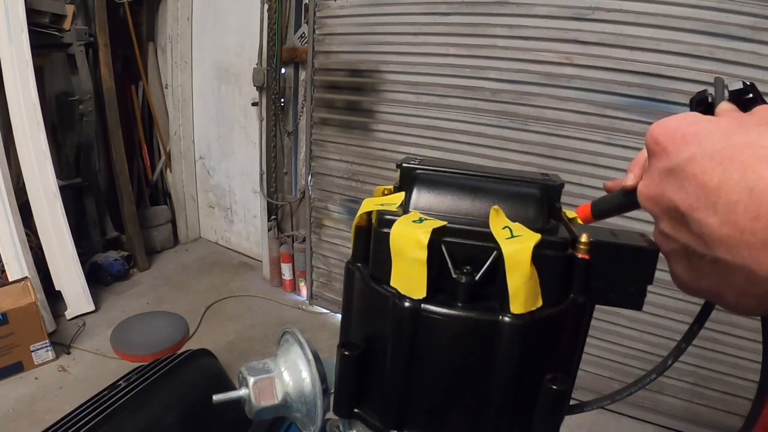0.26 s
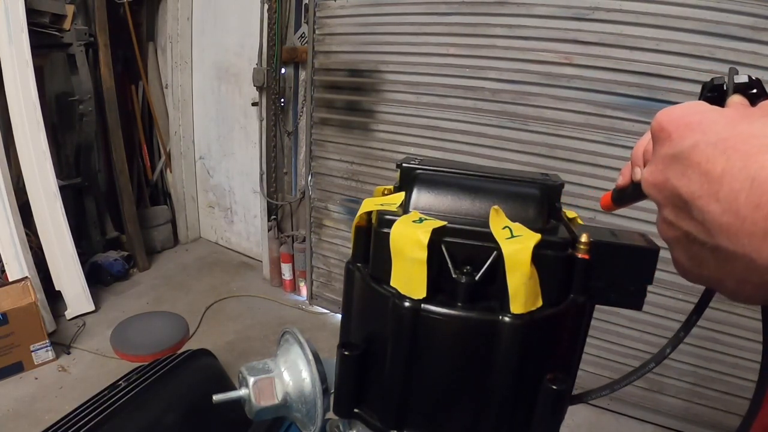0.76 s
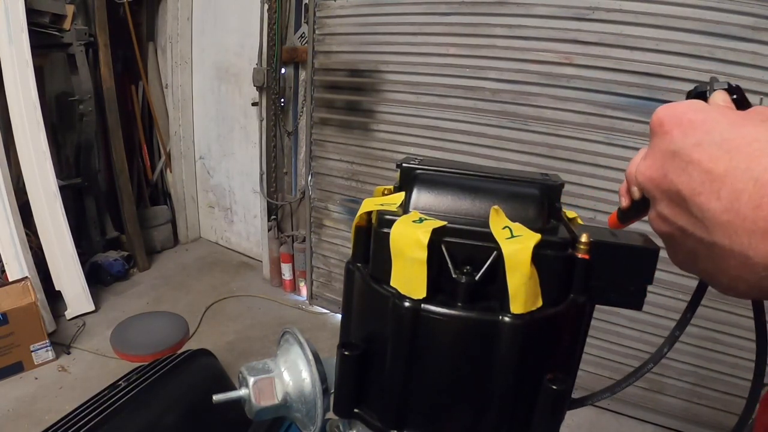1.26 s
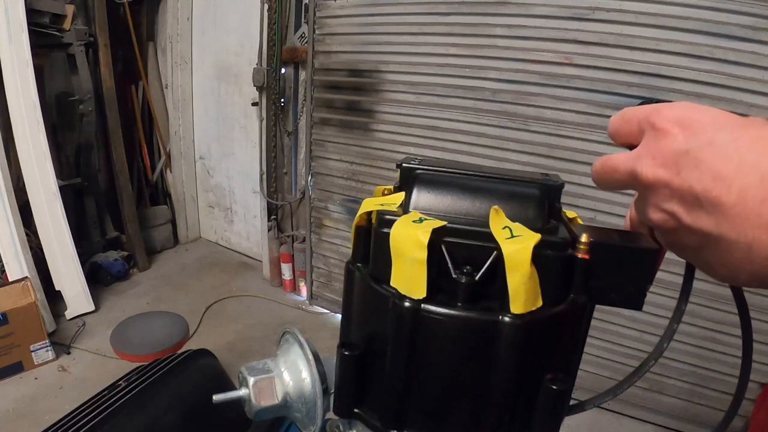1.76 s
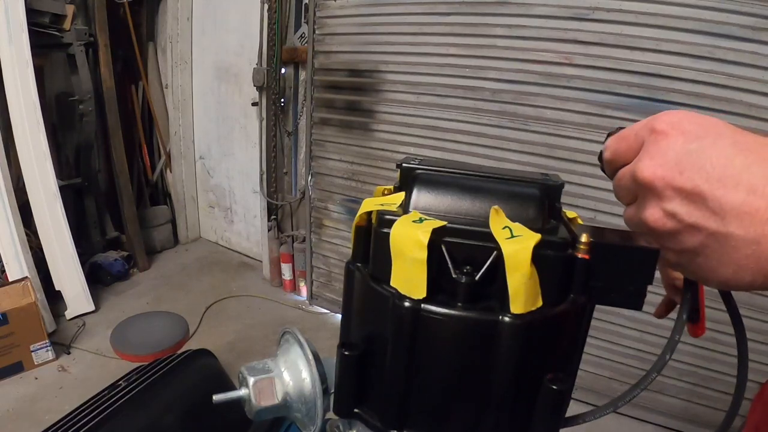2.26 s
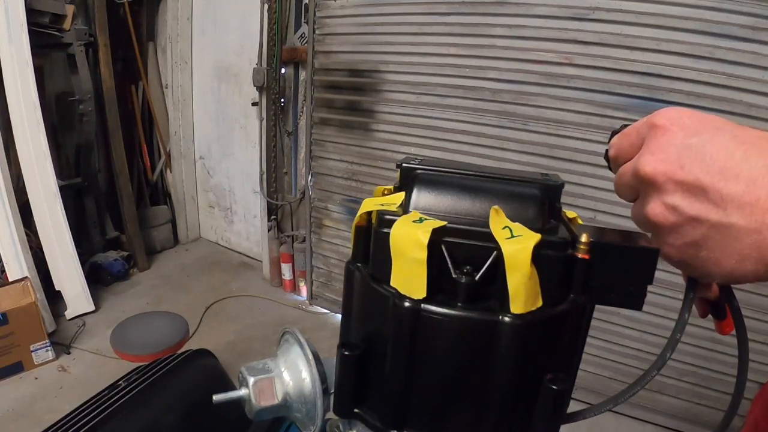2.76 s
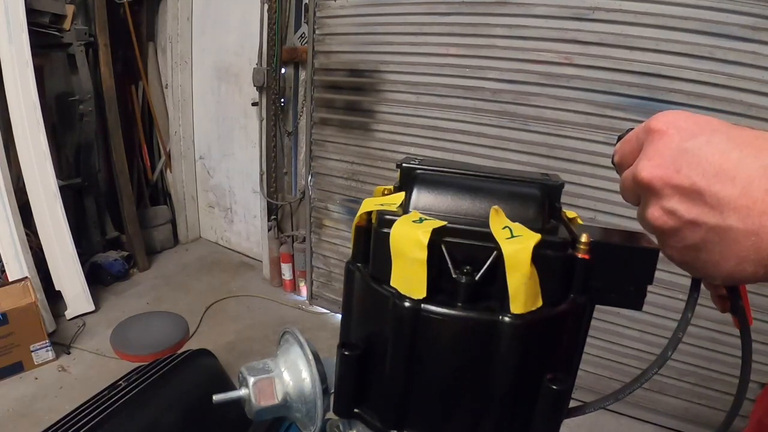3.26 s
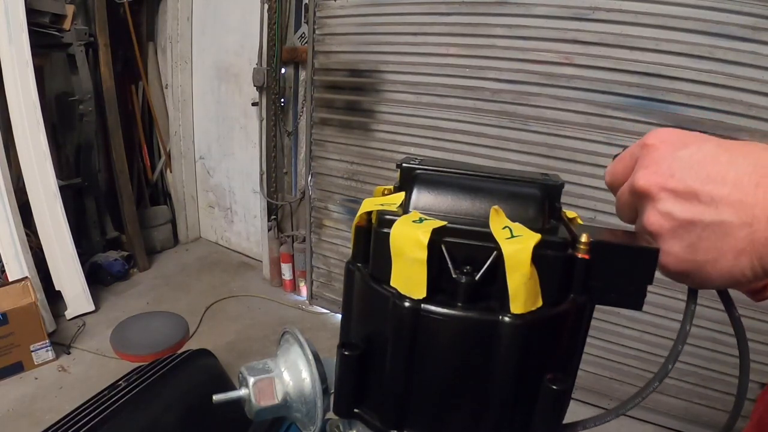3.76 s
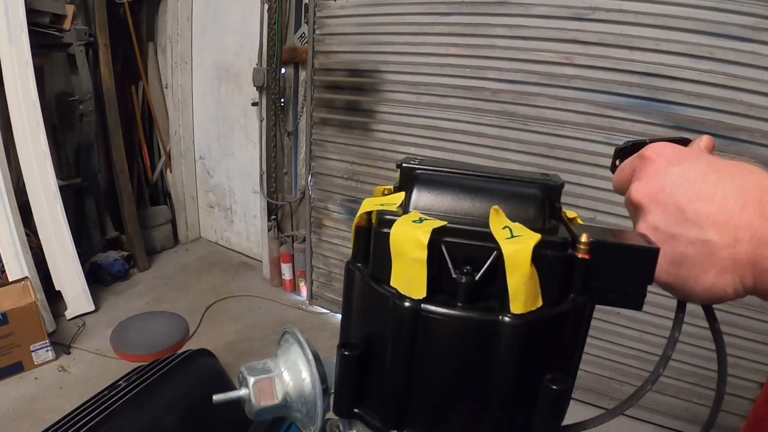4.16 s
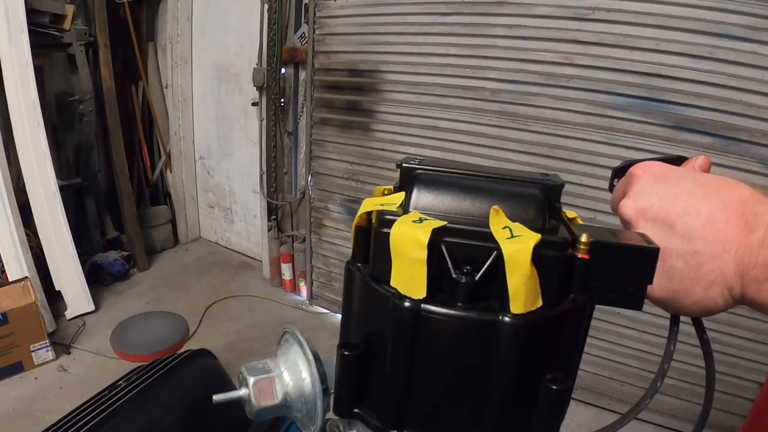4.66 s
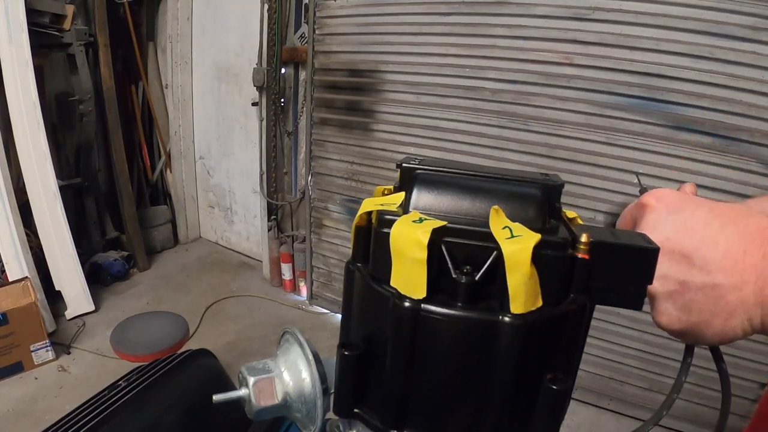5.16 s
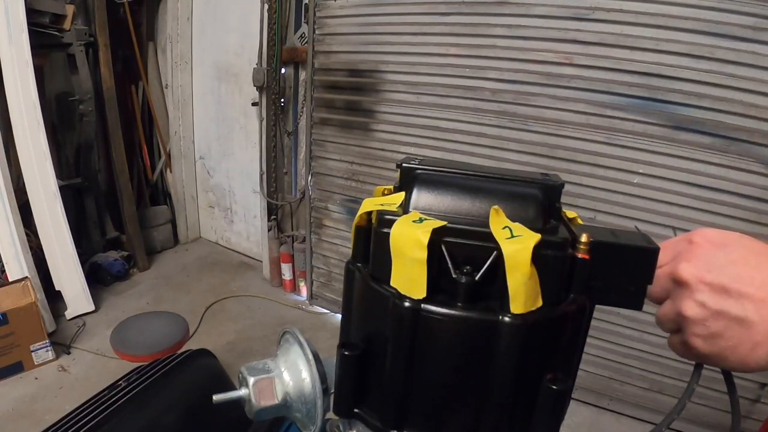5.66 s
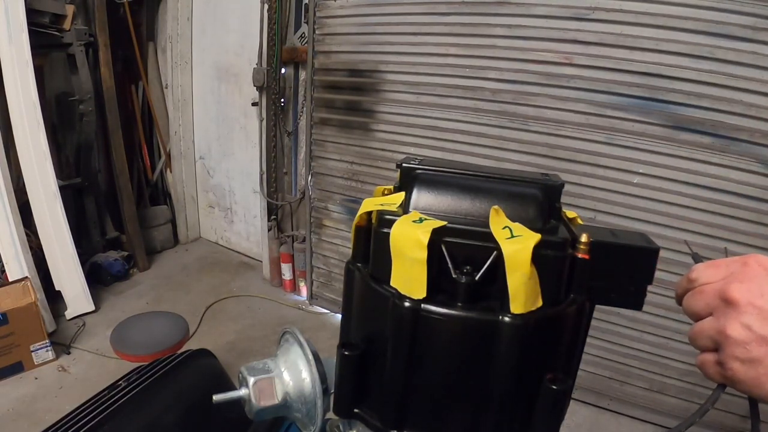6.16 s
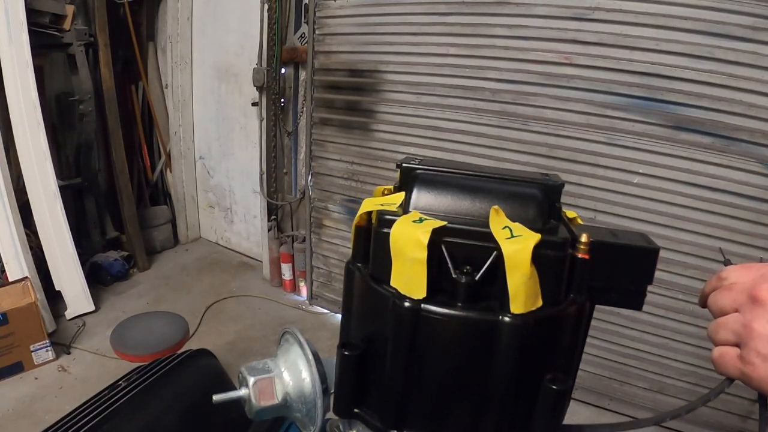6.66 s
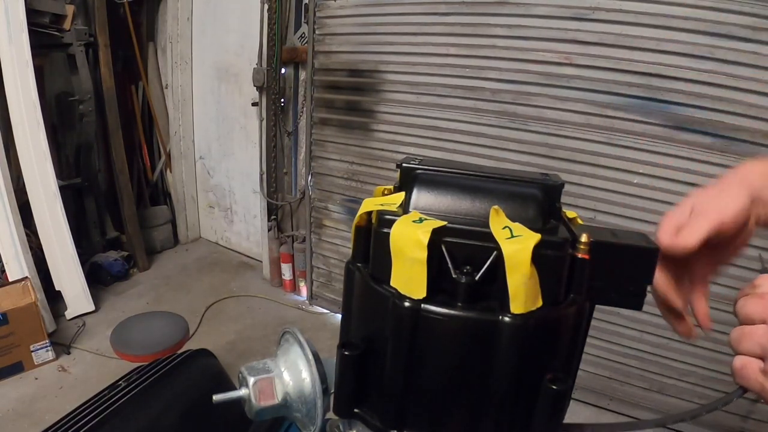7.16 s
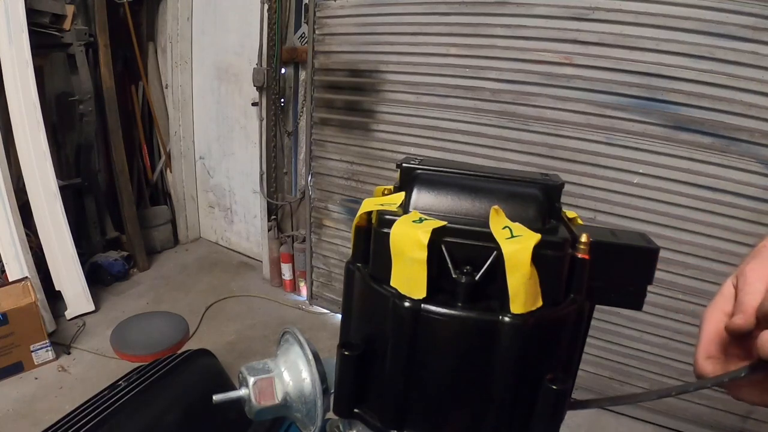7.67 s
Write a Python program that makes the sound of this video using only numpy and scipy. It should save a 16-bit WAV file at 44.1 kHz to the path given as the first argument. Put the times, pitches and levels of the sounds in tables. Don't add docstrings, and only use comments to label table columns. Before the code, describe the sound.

In a hard, echoing garage, ratcheting hand pliers close very near the microphone: three slow, crisp clicks, a pause, then six faster hard snaps. After a small snap and dull jolt the jaws spring open in a rapid rattle. The tool is dropped on a bench with ringing knocks, while hands rub a cable. Distant traffic, faint machine drones and an engine pulling away stay low behind.

```python
import sys
import numpy as np
from scipy import signal
from scipy.fft import irfft
from scipy.io import wavfile
from scipy.ndimage import uniform_filter1d

SR = 44100
rng = np.random.default_rng(int(sys.argv[2]) if len(sys.argv) > 2 else 0)


def amplitude_ratio(level_db):
    exponent = np.asarray(level_db, float) / 20
    return 10 ** exponent


def waveform_to_disk(signal):
    frames = np.transpose(np.atleast_2d(signal))
    scaled = np.clip(frames, -1, 1) * 32767
    samples = np.round(scaled).astype(np.int16)
    wavfile.write(sys.argv[1], SR, samples)


N = 349272

# (time [s], peak [dB], handle re peak [dB], low jaw re peak [dB], tick re peak [dB])
SLOW_TEETH = [
    (.8236, -1.8, 2.5, 0.31, 1.5),
    (1.0004, -0.46, -2, -0.89, 1.8),
    (1.2314, -1.5, -3, -2, 2.7),
]
FAST_TEETH = [
    (3.5657, -2.5, -0.5, -4.5, -0.5),
    (3.6039, 0, -4, -8.5, -2.5),
    (3.6314, -1.5, -5.5, -10.5, -3.5),
    (3.6593, 0.5, -8, -11, -3.5),
    (3.7878, 0, -1, 0, 1),
    (3.8622, 0, -0.5, -5, -0.5),
]
RELEASE = [
    (5.1016, -16, -0.5, -5, 7),
    (5.1717, -9.5, 7, 7.5, 4.5),
    (5.1898, -5, 4, 1, 1.5),
    (5.2016, -7.5, 8, 3, -1.5),
    (5.2141, -4.5, 2, 2, -2),
    (5.2244, -4.5, 5, -3, -2),
    (5.2343, -6.5, 9, 0, -2),
    (5.2459, -7, 6, -3.5, -1.5),
    (5.2953, -6.5, 2, -6.5, -6.5),
]
TICKS = [(.2445, -32, -15.5, -7.5, 1), (.25, -42.5, -26, -6, 0.5), (.4828, -36, -0.5, 5, -6),
         (.579, -43.5, -15.5, -1.5, -1.5), (.6453, -46.5, -10, 5, -2), (.658, -46, -4, 5, -0.5),
         (.803, -41.5, -12.5, -1.5, 1), (.8132, -29, -13, -2.5, 1.5), (.99, -38.5, -20, -13.5, 14),
         (1.221, -37.5, -21.5, -14, 13.5), (2.0625, -45, -10, -1, -4), (2.28, -52, -9.5, -7.5, 5),
         (3.546, -41.5, -13.5, -8, -4), (3.5549, -30, -11, -9.5, -6.5)]
SNAP = [
    (4.8261, -17, -34, 0.015, 0),
    (4.837, -26, 2, 0.005, 0),
]
# (frequency [Hz], level [dB], t60 [s])
JAWS_OPEN = [(2225, -3.5, 0.011), (2650, -2, 0.0076), (2930, 2, 0.005), (3560, -5, 0.0066),
             (3880, -5.5, 0.0032), (4570, -3, 0.0047), (5010, -8.5, 0.011), (5584, -15.5, 0.0098),
             (6180, -9, 0.007), (7680, -6.5, 0.0033), (8600, -11.5, 0.0065), (9510, -8.5, 0.0069),
             (10750, -18, 0.012), (12900, -25, 0.0024)]
JAWS_LOADED = [(2271, -4, 0.0044), (2700, -2.5, 0.0061), (2909, -6.5, 0.0087), (3500, -3, 0.0054),
               (3876, -2.5, 0.0081), (4300, -4, 0.0047), (4470, -6, 0.0087), (5130, -7.5, 0.004),
               (6320, -10, 0.0047), (7260, -8, .005), (8230, -8.5, 0.0047), (9250, -13, 0.003),
               (10500, -15.5, 0.0057), (12110, -23.5, .003)]
JAWS_FREE = [(1360, -13, 0.0078), (2000, -9.5, 0.0031), (2450, -1, 0.0075), (2650, -5, 0.0066),
             (2940, -2, 0.0087), (3930, -1.5, 0.0035), (4480, -5, 0.0054), (5260, -11.5, 0.0045),
             (5925, -6, 0.003), (6800, -4.5, 0.0031), (7450, -8, 0.0031), (8400, -9.5, 0.0028),
             (9660, -8.5, .004), (10780, -11, 0.0044), (13000, -16.5, 0.0036)]
JAWS_SNAP = [(2720, -10, 0.01), (4990, -2, 0.024), (6300, -1, 0.02), (8170, -10, 0.0066), (9750, 5.5, .012),
             (10950, -2.5, 0.013), (13160, -7, .005)]
# (frequency [Hz], level [dB], t60 [s])
GRIP_MODES = [(627.7, -6.5, 0.016), (860, -2.5, 0.012), (1130, 0.5, .018)]
GRIP_DB = [-36, -26.5, -28, -30, -40]
# (time [s], frequency [Hz], level [dB], t60 [s])
PAWL = [(.824, 2050, -13, .01), (0.999, 2933, -11, .018), (1.001, 4704, -10, 0.011),
        (1.233, 2910, -12, 0.011), (3.606, 3750, -11.5, .01), (3.631, 3500, -8, .007),
        (3.6592, 3670, -9.5, .007), (3.863, 3850, -9.5, 0.009), (5.172, 2430, -9.5, 0.0096),
        (5.19, 2510, -13, .015), (5.201, 2550, -12.5, 0.013), (5.215, 2465, -19, .015),
        (5.225, 3050, -23, 0.012), (5.235, 3100, -26.5, 0.011), (5.246, 3000, -18, 0.019),
        (5.295, 3130, -13, 0.011)]
# (time [s], frequency [Hz], level [dB], t60 [s])
RINGS = [(.579, 2800, -54, .2), (.579, 3003, -58, .2), (.579, 3620, -53, 0.11), (.581, 5800, -60, 0.08),
         (.58, 8600, -71, .06), (.657, 8620, -63, .06), (.646, 3714, -52, .05), (.655, 2800, -56, 0.3),
         (6.292, 1722, -44, 0.95), (6.292, 1980, -37, 1), (6.292, 2540, -36, 0.77),
         (6.292, 3910, -47, 0.85), (6.292, 4460, -49, 0.78), (.826, 4330, -37.5, 0.44),
         (.826, 2455, -41, 0.46), (1.003, 2800, -45, 0.67), (1.003, 4387, -48, .5),
         (1.234, 2800, -49, 0.32), (1.234, 4334, -54, 0.36), (5.25, 1742, -47, 0.2), (5.298, 4300, -38, .3),
         (6.291, 335, -20.5, 0.25), (6.292, 2000, -35, 0.53), (6.29, 2610, -33, 0.38),
         (6.291, 1440, -44, 1), (6.292, 3360, -45, 1), (6.487, 346, -21.5, 0.44),
         (6.564, 2700, -25.5, 0.11), (6.564, 2970, -28, 0.084), (6.564, 372, -14.5, 0.16),
         (6.59, 1450, -30, 0.32), (6.599, 430, -23.5, 0.35), (6.718, 335, -23, 0.2), (5.9, 90, -38, 0.38),
         (7.76, 355, -40.5, 0.19), (6.291, 1080, -36, .12), (3.864, 1010, -28, .03), (4.83, 9600, -49, .25)]
# (time [s], length [s], level [dB])
SPRING = [
    (3.606, 0.064, -45.5),
    (3.67, 0.11, -41.5),
    (3.797, 0.066, -42.5),
]
# (time [s], peak [dB], boom re thud [dB], edge re thud [dB], tick re edge [dB])
KNOCKS = [(4.825, -20, 12, 6, 7), (6.267, -33.5, -7, 0, -15), (6.2778, -20, 2, -2, -9),
          (6.2884, 0.5, 0.5, 0, -7), (6.478, -42, -5, 9, 10), (6.483, -9, -12, -9, -10),
          (6.554, -20.5, -7, -6, 0), (6.516, -18.5, -8, -26, -6), (6.527, -13.5, 7, -21, -7),
          (6.56, -2, 1, -6.5, -2), (6.575, -7.5, 2, -6, -7), (6.597, -14.5, -16, 9, 1.5),
          (6.61, -39, -7, 4, 10), (6.617, -19, 11, -18, -5), (6.678, -17.5, -11, 3, 1),
          (6.7126, -26, -3, 8, 9), (6.717, -21, 5, -11, 0), (6.72, -32, -1, 8, 13.5)]
# (frequency [Hz], level [dB], t60 [s])
BENCH = [(209, -12, 0.052), (335, -3, 0.027), (430, -10, 0.073), (510, 4, 0.014), (729, 2, 0.021),
         (812, -2.5, 0.037), (987, -1.5, 0.012)]
EDGE = [(1235, -2, 0.032), (1450, 0, 0.025), (1773, -2, 0.031), (2000, -3, 0.019), (2190, 0, 0.013),
        (2554, 2.5, 0.016), (2800, -2.5, 0.015), (2980, 0.5, 0.0082), (3500, -9.5, .012),
        (3933, -8.5, 0.021), (4950, -12, 0.012), (5470, -22, 0.01), (6370, -19.5, 0.007)]
# (frequency [Hz], level [dB], t60 [s])
THUMP = [(119, -4, 0.07), (148, -4, 0.093), (224, -4, 0.059)]
# (peak time [s], rise [s], fall [s], level [dB])
SLIDE = [
    (6.53, 0.02, 0.046, -14),
    (6.58, 0.03, 0.043, -10),
    (6.702, 0.049, 0.055, -16),
]
# (peak time [s], rise [s], fall [s], level [dB], tilt [dB/octave])
RUB = [
    (4.827, 0.016, 0.047, -36.5, 2),
    (4.88, 0.035, .22, -65, -6),
    (5.098, 0.023, 0.012, -49, 8),
    (5.945, 0.096, 0.23, -54.5, 0.8),
    (6.08, 0.12, 0.22, -58.5, 0.5),
    (6.8, .15, 0.8, -61, -3),
    (7.25, .5, 0.32, -62, -0.5),
    (7.71, 0.032, 0.46, -54.5, -7.5),
    (6.56, 0.11, 0.21, -53, -2),
]
# (frequency [Hz], density [dB/Hz])
RUB_TONE = [(1180, -72), (2000, -1), (3210, -4.5), (4590, -3), (5310, -7.5), (6300, -8.5), (10600, -18),
            (14000, -34)]
# (frequency [Hz], t60 [s])
GARAGE = [(300, 0.45), (1000, 0.67), (2500, 0.71), (5000, 0.62), (8000, 0.46), (13000, 0.26)]
# (frequency [Hz], level [dB])
WALLS = [(1000, 8), (2000, 1.5), (3000, -1), (4300, 1.5), (5400, 0), (7000, -1.5), (9000, -3),
         (13000, -1.5)]
# (delay [s], level [dB])
ECHOES = [
    (.007, -15.5),
    (.009, -25),
    (0.0138, -27.5),
]
# (order [per turn], level [dB])
ENGINE = [(3, -41), (4, -44.5), (6, -53.5)]
# (frequency [Hz], level [dB])
EXHAUST = [(80, -32), (90, -10), (98, 0.5), (104, -4.5), (125, -9.5), (138, 1), (155, -35)]
# (start [s], end [s], frequency [Hz], first level [dB], last level [dB])
DRONE = [
    (0, 1.047, 220.5, -45.5, -55),
    (1.598, 2.445, 288.2, -60, -50),
    (3.7, 7.896, 172.2, -49.5, -40),
]
# (frequency [Hz], density [dB/Hz])
ROAD = [(15, -50.5), (25, -22.5), (82, -6), (114, -4.5), (166, -1), (200, -0.5), (285, -4), (317, -8),
        (476, -16), (531, -23), (1100, -15), (1480, -20), (2160, -28), (9320, -55.5), (16000, -63)]
# (time [s], level [dB])
TRAFFIC = [(0, -0.7), (.7, 0.9), (1.1, -1.5), (2.4, 0), (3.6, -0.5), (5.4, -1.5), (6.3, 2), (7.1, -1.7),
           (7.7, 2), (7.92, 2)]

HANDLE_HZ, HANDLE_DB, HANDLE_T60_S = 1725, -13, 0.022
HANDLE_HOLD_S = 0.0073
REBOUND_GAIN, REBOUND_S = 0.38, 0.0016
SPRING_HZ, SPRING_DB_PER_S = 940, -38.5
THUMP_S, THUMP_DB = 4.824, -24
STROKE_DB = 19
ENGINE_START_S, ENGINE_END_S = 5.0, 7.8
ENGINE_HZ, REV_HZ_PER_S = 16.8, 6.2
ROAD_DB, HISS_SHARE = -44, 0.3
DUCK_FROM_DB, DUCK_SHARE, RECOVER_DB_PER_S = -19, 0.43, 44


def pliers():
    out, t = np.zeros((2, N)), np.arange(6000) / SR
    handle = amplitude_ratio(HANDLE_DB + 2.5 - 60 * t / HANDLE_T60_S) * np.sin(2 * np.pi * HANDLE_HZ * t)
    handle *= (1 - np.exp(-t / 0.00085)) * np.exp(-(t / HANDLE_HOLD_S) ** 4)
    groups = [(SLOW_TEETH, JAWS_OPEN), (FAST_TEETH, JAWS_LOADED), (RELEASE, JAWS_FREE),
              (TICKS, JAWS_OPEN), (SNAP, JAWS_SNAP)]
    for (teeth, jaws), grip_db in zip(groups, GRIP_DB):
        hz = np.array(jaws)[:, :1]
        for s, db, handle_db, low_db, tick_db in teeth:
            weight = amplitude_ratio(np.select([hz < 3400, hz > 5600], [low_db, tick_db], 0))
            click = struck((weight * ring(jaws, spread_db=1.2, detune=0.012)).sum(0), rise_s=0.0003)
            rebound = struck((weight * ring(jaws, spread_db=1.2, detune=0.012)).sum(0), rise_s=0.0003)
            add(click, REBOUND_S, REBOUND_GAIN * rebound)
            knock = ring(GRIP_MODES, spread_db=3.5, detune=0.065).sum(0)
            add(out[0], s, amplitude_ratio(db) * (click + amplitude_ratio(handle_db) * handle))
            add(out[0], s, amplitude_ratio(db + handle_db + grip_db) * knock)
            add(out[1], s, amplitude_ratio(db - 0.7) * spread(jaws, weight, click))
            add(out[1], s, amplitude_ratio(db) * (0.29 * click + amplitude_ratio(handle_db - 5) * handle))
    return out


def singing():
    out, t = np.zeros(N), np.arange(SR // 3) / SR
    for s, hz, db, t60 in RINGS + PAWL:
        beat, turn = rng.random(2)
        neighbour_hz = hz + 10 + 25 * beat
        pair = np.sin(2 * np.pi * hz * t) + 0.54 * np.sin(2 * np.pi * (neighbour_hz * t + turn))
        add(out, s, amplitude_ratio(db - 60 * t / t60) * pair * (1 - np.exp(-t / 0.0012)))
    return out


def spring():
    out = np.zeros(N)
    for s, length_s, db in SPRING:
        fade_db = SPRING_DB_PER_S * np.arange(0, length_s, 1 / SR)
        add(out, s, tone(SPRING_HZ, db + fade_db, waver=0.2))
    return out


def bench():
    out, hz, t = np.zeros((2, N)), np.array(BENCH)[:, :1], np.arange(6000) / SR
    grit_band = signal.butter(3, [2600, 9000], "bandpass", fs=SR, output="sos")
    for s, db, boom_db, edge_db, tick_db in KNOCKS:
        boom = amplitude_ratio(boom_db * (hz < 480))
        thud = struck((boom * ring(BENCH, spread_db=1.5, detune=0.02)).sum(0), rise_s=0.0007)
        edge = amplitude_ratio(edge_db) * struck(ring(EDGE, spread_db=1.5, detune=0.015).sum(0), rise_s=0.0003)
        grit = signal.sosfilt(grit_band, rng.standard_normal(len(t)) * amplitude_ratio(-60 * t / 0.021))
        tick = amplitude_ratio(edge_db + tick_db - 20.5) * struck(grit, rise_s=0.00072)
        gain = amplitude_ratio(db) / abs(thud + edge).max()
        add(out[0], s, gain * (thud + edge + tick))
        add(out[1], s, gain * (amplitude_ratio(-16.5) * thud + amplitude_ratio(2) * tick))
        add(out[1], s, gain * amplitude_ratio(-1.5) * spread(EDGE, np.ones(1), edge))

    jolt = struck(ring(THUMP, spread_db=0.5, detune=0).sum(0), rise_s=0.002)
    add(out[0], THUMP_S, amplitude_ratio(THUMP_DB) * jolt)

    body = struck(ring(BENCH, spread_db=3.5, detune=0.011).sum(0) * amplitude_ratio(-900 * t), rise_s=0.0014)
    body = signal.sosfilt(signal.butter(2, 1500, fs=SR, output="sos"), body)
    for s, rise_s, fall_s, db in SLIDE:
        slips = rng.standard_normal(9000) * (rng.random(9000) < 500 / SR)
        chatter = signal.fftconvolve(slips, body)
        level = amplitude_ratio(db - 6.5) * stroke(rise_s, fall_s)
        add(out[0], s - rise_s, level * evened(chatter[:len(level)]))
    return out


def hands():
    out, hz = np.zeros(N), np.fft.rfftfreq(256, 1 / SR)[:, None]
    for s, rise_s, fall_s, db, tilt in RUB:
        colour_db = read(RUB_TONE, hz) + np.log2((hz + 1) / 4000) * tilt
        grain_db = 2.3 * rng.standard_normal(SR // 64)
        hiss = evened(shaped(colour_db + grain_db, size=256))
        level = stroke(rise_s, fall_s)
        add(out, s - rise_s, amplitude_ratio(db) * level * hiss[:len(level)])
    return out


def spread(modes, weight, sound):
    hz, db, _ = np.transpose(modes)
    f = np.fft.rfftfreq(512, 1 / SR)
    skirt = np.clip(f / hz[0], 0, 1) ** 4 * np.clip(hz[-1] / (f + 1), 0, 1) ** 6
    lag_s = 0.002 * (1 + np.sin(f / 400 + 2 * np.pi * rng.random()))
    phase = -2j * np.pi * np.cumsum(lag_s) * f[1]
    burst = irfft(np.interp(f, hz, amplitude_ratio(db) * weight.ravel()) * skirt * np.exp(phase))
    burst = np.roll(burst, 60) * signal.windows.tukey(512, 0.2)
    return burst / np.linalg.norm(burst) * np.linalg.norm(sound)


def garage(x):
    taps = np.zeros(SR)
    at = np.arange(110, SR - 20, 12)
    taps[at + rng.integers(0, 12, len(at))] = rng.choice([-1., 1.], len(at))
    taps *= np.clip((np.arange(SR) / SR - 0.005) / 0.0061, 0.3, 1)
    hz, t, z = signal.stft(taps, SR, nperseg=256)
    decay_db = read(WALLS, hz)[:, None] - 60 * t / read(GARAGE, hz)[:, None]
    tail = signal.istft(z * amplitude_ratio(decay_db), SR, nperseg=256)[1]
    tail = amplitude_ratio(-9) * tail / np.linalg.norm(tail)
    for s, db in ECHOES:
        tail[round(s * SR)] += amplitude_ratio(db)
    return signal.fftconvolve(x, tail)[:N]


def motors():
    out = np.zeros(N)
    for start, end, hz, first_db, last_db in DRONE:
        level_db = np.interp(np.arange(start, end, 1 / SR), [start, end], [first_db, last_db])
        add(out, start, tone(hz, level_db, waver=0.3))
    turn_hz = ENGINE_HZ + REV_HZ_PER_S * np.arange(0, ENGINE_END_S - ENGINE_START_S, 1 / SR)
    for order, db in ENGINE:
        order_hz = round(order) * turn_hz
        add(out, ENGINE_START_S, tone(order_hz, db + read(EXHAUST, order_hz), waver=0.25))
    return out


def road():
    hz, t = np.fft.rfftfreq(2048, 1 / SR), np.arange(N // 512 + 6) * 512 / SR
    rumble_db = np.interp(t, *np.transpose(TRAFFIC))
    hiss_db = HISS_SHARE * rumble_db
    low = np.clip(np.log(600 / (hz + 1)) / 0.41, 0, 1)[:, None]
    patches = uniform_filter1d(rng.standard_normal((len(t), len(hz))), size=8, axis=0)
    patches = evened(uniform_filter1d(patches, size=6, axis=1)).T
    steady_db = read(ROAD, hz)[:, None]
    rms = np.sqrt(np.mean(shaped(steady_db + 0 * t, size=2048) ** 2))
    moving_db = steady_db + low * rumble_db + (1 - low) * hiss_db + 1.3 * patches
    return amplitude_ratio(ROAD_DB) / rms * shaped(moving_db, size=2048)[:N]


def ring(modes, spread_db, detune):
    hz, db, t60 = np.transpose(modes)[:, :, None]
    a, b = rng.standard_normal((2, len(modes), 1))
    t = np.arange(6000) / SR
    turns = np.arange(len(modes))[:, None] / 2 + 0.26 * rng.random(hz.shape)
    wave = np.sin(2 * np.pi * (hz * (1 + detune * b) * t + turns))
    return amplitude_ratio(db + spread_db * a - 60 * t / t60) * wave


def struck(sound, rise_s):
    sound = sound * (1 - np.exp(-(np.arange(len(sound)) / (rise_s * SR)) ** 2))
    return sound / abs(sound).max()


def stroke(rise_s, fall_s):
    t = np.arange(-rise_s, fall_s, 1 / SR)
    return amplitude_ratio(-STROKE_DB * np.maximum(-t / rise_s, t / fall_s)) * signal.windows.tukey(len(t), 0.1)


def tone(hz, db, waver):
    drift = waver * evened(uniform_filter1d(rng.standard_normal(len(db)), size=3000))
    wave = np.sin(2 * np.pi * np.cumsum(hz + 0 * db) / SR + drift)
    return np.sqrt(2) * amplitude_ratio(db) * wave * signal.windows.tukey(len(db), 0.08)


def shaped(db, size):
    a, b = rng.standard_normal((2,) + db.T.shape)
    return signal.istft((a + 1j * b).T * amplitude_ratio(db), nperseg=size, noverlap=size * 3 // 4)[1]


def evened(x):
    return x / np.sqrt(np.mean(x ** 2) + 1e-20)


def read(points, hz):
    f, value = np.transpose(points)
    return np.interp(np.log(hz + 1), np.log(f + 1), value)


def add(mix, s, sound):
    part = mix[round(s * SR):][:len(sound)]
    part += sound[:len(part)]


def scene():
    near, far = pliers() + bench(), road() + motors()
    thin = spring() + singing()
    body = signal.butter(2, 90, "highpass", fs=SR, output="sos")
    treble = signal.butter(6, 13400, fs=SR, output="sos")
    close = near[0] + thin + garage(near[1] + 0.31 * thin) + hands()
    close = signal.sosfilt(np.vstack([body, treble]), close)
    return np.array([close + far, close + far])


def ducked(x):
    power_db = 10 * np.log10(signal.lfilter([0.002], [1, -0.998], x[0] ** 2) + 1e-12)
    fall_db = np.arange(N) * RECOVER_DB_PER_S / SR
    held_db = np.maximum.accumulate(power_db + fall_db) - fall_db
    over_db = np.maximum(held_db - DUCK_FROM_DB, 0)
    return x / amplitude_ratio(DUCK_SHARE * signal.lfilter([0.005], [1, -0.995], over_db))


def roll_off(x):
    return signal.sosfilt(signal.butter(12, 16800, fs=SR, output="sos"), x)


def record(dry):
    top = signal.butter(4, [11600, 13800], "bandpass", fs=SR, output="sos")
    upper = signal.butter(2, 2500, "highpass", fs=SR, output="sos")
    capsule = signal.butter(4, 14800, fs=SR, output="sos")
    scramble, hiss = rng.standard_normal((2, N))
    scramble = evened(uniform_filter1d(scramble, size=60))
    bright = signal.sosfilt(upper, dry[0])
    sharp = uniform_filter1d(abs(bright), size=200) > 0.03
    click_part = sharp * (amplitude_ratio(-28) * bright + amplitude_ratio(-36) * dry[0])
    apart = scramble * (amplitude_ratio(-5.5) * signal.sosfilt(top, dry[0]) + click_part)
    apart += amplitude_ratio(-86.5) * signal.sosfilt(top, hiss)
    parted = ducked(dry + np.array([apart, -apart]))
    mix = signal.sosfilt(capsule, 1.313 * np.tanh(parted / 1.34))
    return roll_off(mix)


dry = scene()
out = record(dry)
waveform_to_disk(out)
```